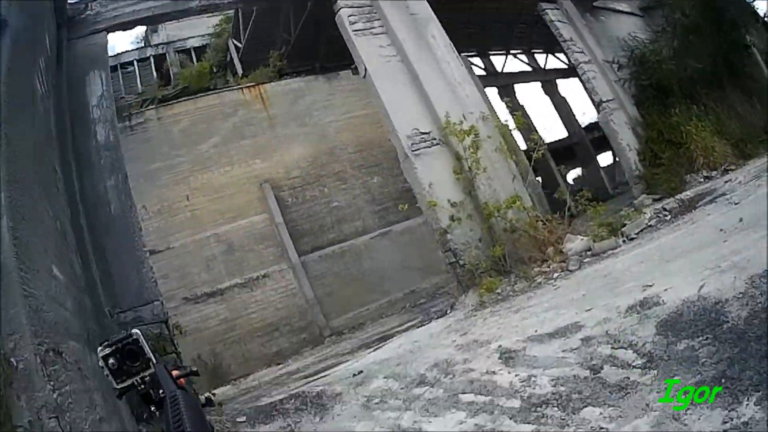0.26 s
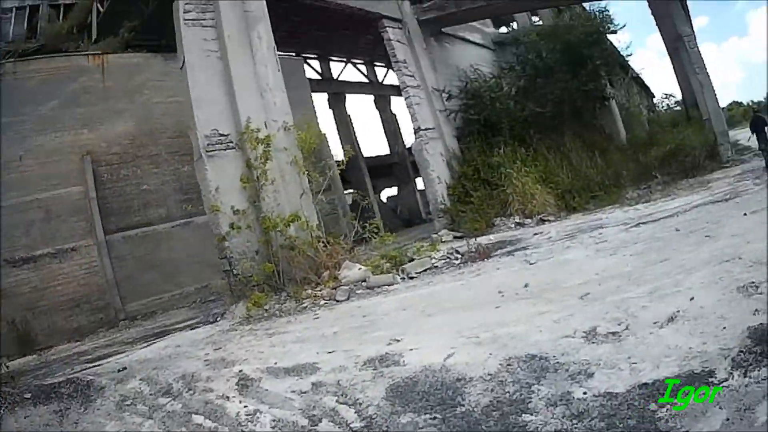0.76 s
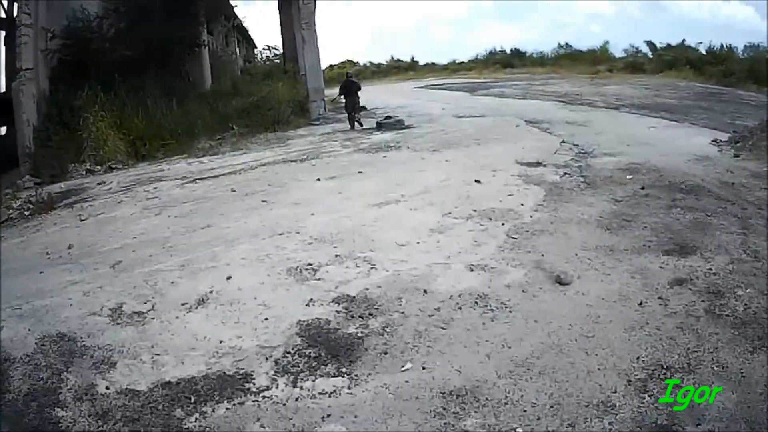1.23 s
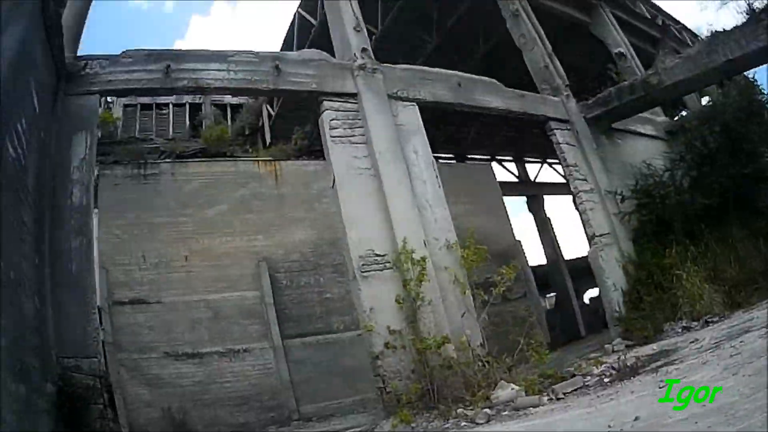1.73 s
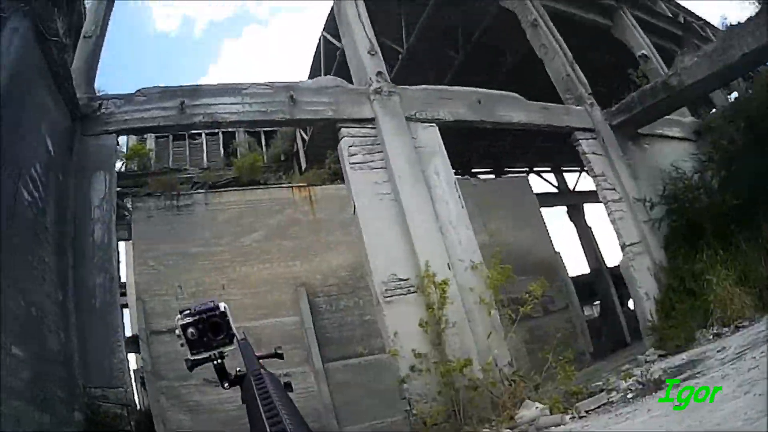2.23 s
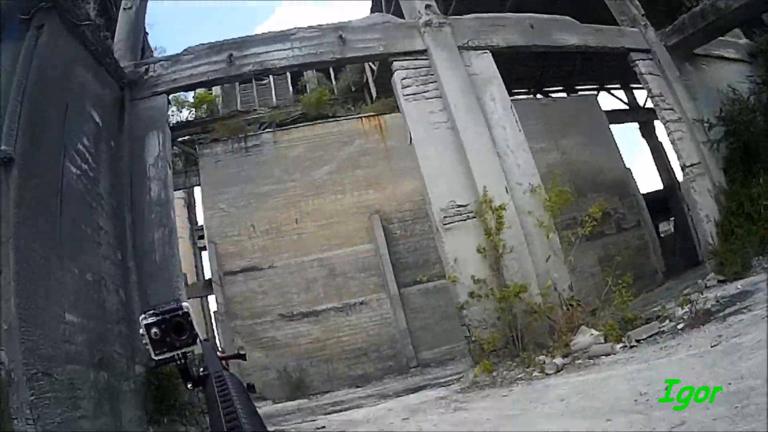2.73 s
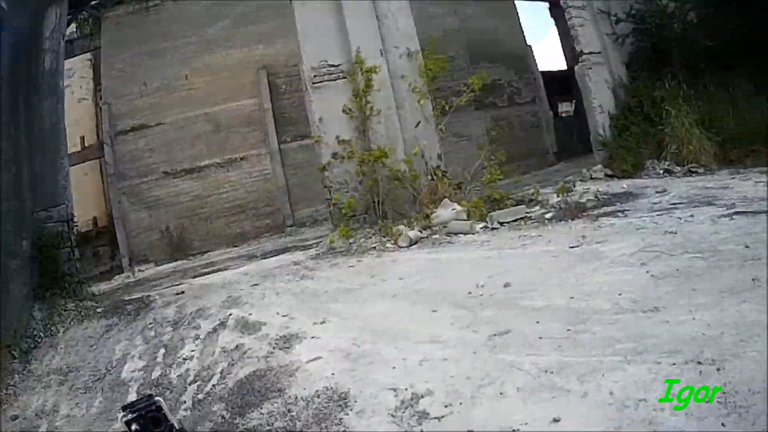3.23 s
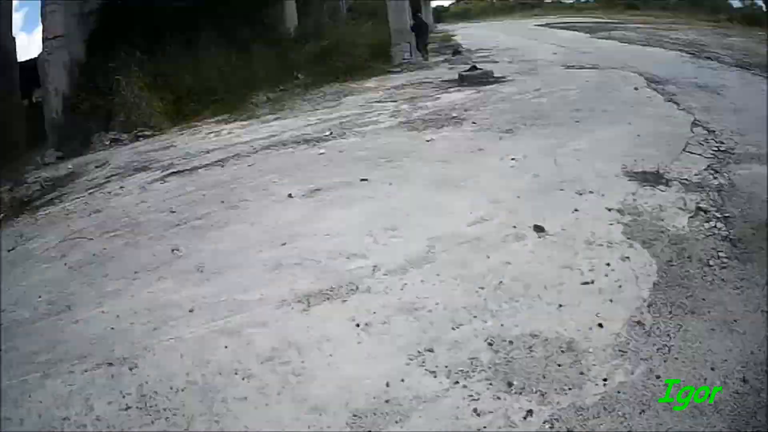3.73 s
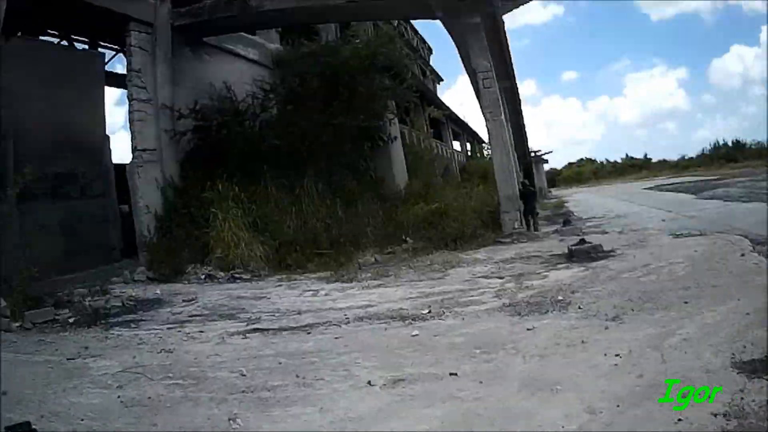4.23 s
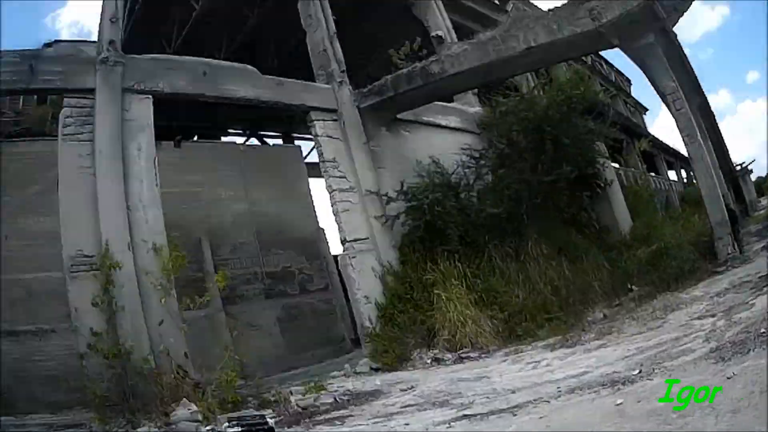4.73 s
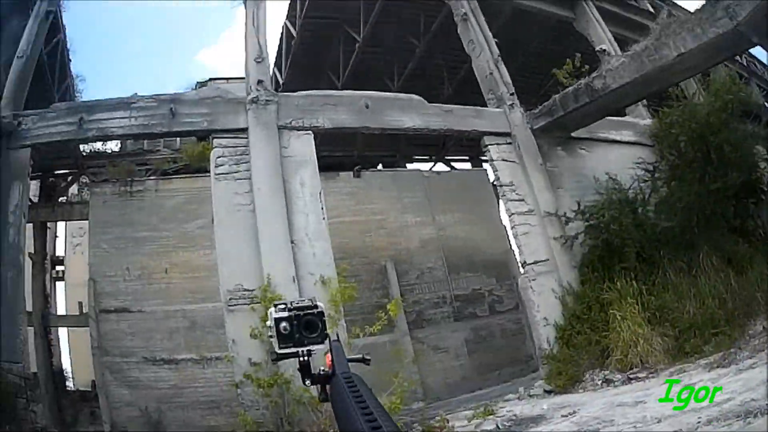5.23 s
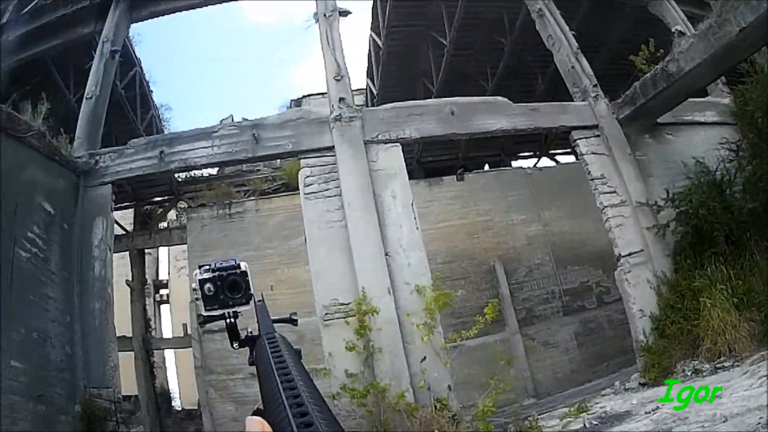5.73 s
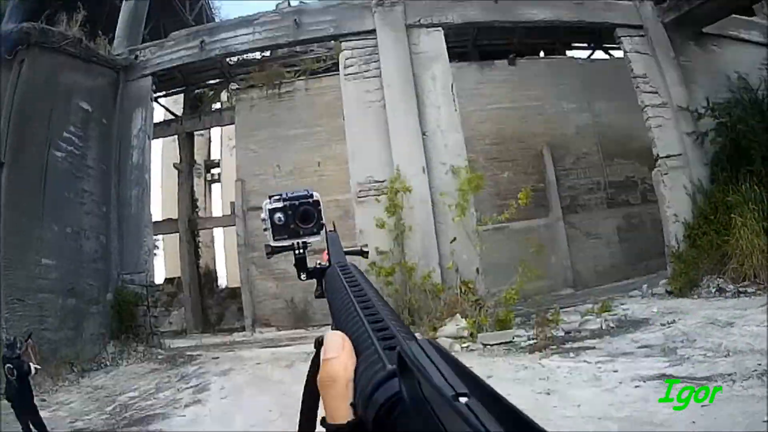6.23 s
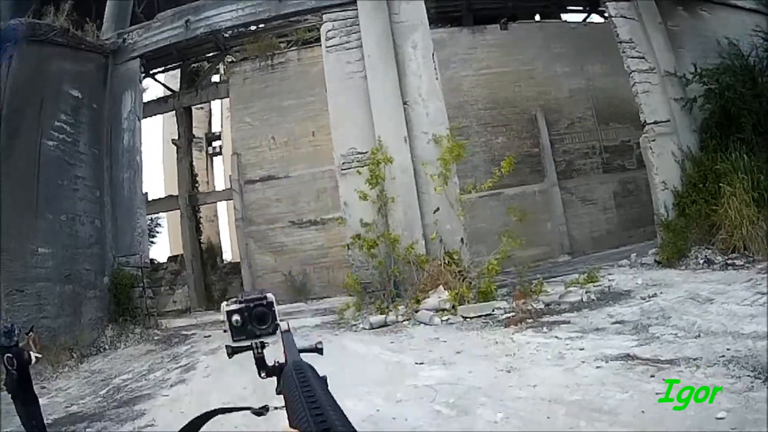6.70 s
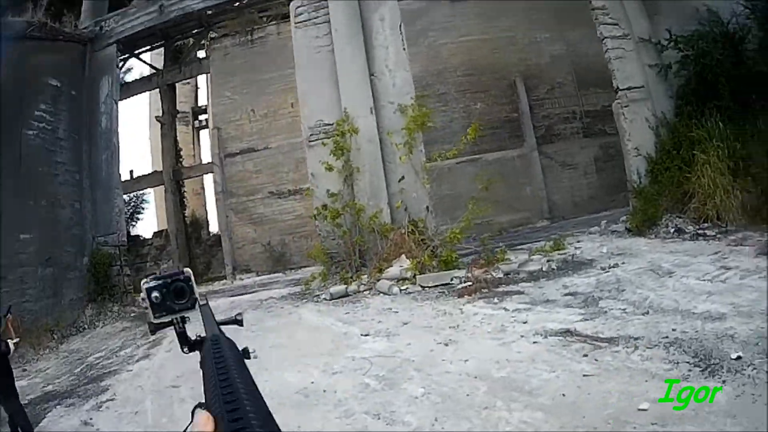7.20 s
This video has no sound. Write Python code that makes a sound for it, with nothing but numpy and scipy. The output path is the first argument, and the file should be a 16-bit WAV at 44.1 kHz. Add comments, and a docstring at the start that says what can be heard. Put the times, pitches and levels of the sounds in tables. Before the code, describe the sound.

Clustered dull jolts and hard plastic-like ticks come about twice a second as worn gear bounces with someone's steps. Early steps are light, then several heavy ones thump with gritty scuffing; a crisp click sounds halfway, and later steps keep knocking, some with a faint thin metallic ring. The sound is very close, muffled and dry, carried through the body, with a quiet open-air rumble and soft hiss between steps.

```python
"""Dull thuds, bounces and knocks of loose gear, with short scuffs of cloth and grit, follow someone's steps.
The walk is over a gritty concrete floor in an open ruin, the microphone worn on the body in a closed case.
Each step jolts the case through the body: pressure pulses push it, and forces ring its modes and fittings.
Shaped noise gives the sway of each stride, the far outdoor rumble and the hiss of the microphone."""
import sys
import numpy as np
from scipy import signal
from scipy.fft import rfft, irfft
from scipy.io import wavfile

SR = 44100
rng = np.random.default_rng(int(sys.argv[2]) if len(sys.argv) > 2 else 0)


def bounce(signal):
    """Save signal as a 16-bit WAV file at the path given by the first command-line argument."""
    frames = np.transpose(np.atleast_2d(signal))
    limited = np.clip(frames, -1, 1)
    pcm = np.round(limited * 32767).astype(np.int16)
    wavfile.write(sys.argv[1], SR, pcm)


def undo_db(level):
    """Turn decibels back into plain size, where 20 dB means ten times bigger."""
    steps = np.asarray(level, float) / 20
    return 10 ** steps


N = 328986   # length in samples


def rms_one(x):
    """Normalization: scales a signal to an rms of 1."""
    return x / np.sqrt(np.mean(x ** 2) + 1e-20)


def butter(x, order, hz, kind="low"):
    """Butterworth filtering: a maximally flat pass band."""
    return signal.sosfilt(signal.butter(order, hz, kind, fs=SR, output="sos"), x)


def ring(force, hz, t60):
    """Damped resonance: a unit click sets a decaying sine of initial height 1 ringing."""
    radius = undo_db(-60 / (t60 * SR))
    w = 2 * np.pi * hz / SR
    return signal.lfilter([0, np.sin(w)], [1, -2 * radius * np.cos(w), radius ** 2], force + 1e-18)


def add(out, start_s, shape):
    """Superposition: mixes a shape in at a time."""
    i = max(round(start_s * SR), 0)
    out[i:i + len(shape)] += shape[:N - i]


# Spectrum of the background noise. Each row: frequency in Hz, relative level in dB per Hz.
RUMBLE_SPECTRUM = [(53, -30), (90, 0.5), (307, -3.5), (3150, -26), (13900, -30), (15500, -31.5)]
RUMBLE_DB = -61.5   # rms


def rumble():
    """Spectral shaping of steady noise: far rumble below, microphone hiss above."""
    hz, level_db = np.transpose(RUMBLE_SPECTRUM)
    bins_hz = np.arange(N // 2 + 1) * SR / N + 1
    colour = undo_db(np.interp(np.log(bins_hz), np.log(hz), level_db))
    noise = irfft(rfft(rng.standard_normal(N)) * colour, N)
    return undo_db(RUMBLE_DB) * rms_one(noise)


# Lurches of the body with each stride. Each row: peak time in seconds, level at the peak in dB.
STRIDES = [(0.25, -50.5), (0.58, -56), (1.04, -49.5), (1.56, -50), (2.04, -45.5), (2.55, -51),
           (3.06, -52.5), (3.6, -51), (4.23, -47.5), (4.76, -51), (5.15, -55), (5.65, -47), (6.28, -48.5),
           (6.75, -56), (7.35, -52)]
SWAY_RISE_DB_PER_S, SWAY_FALL_DB_PER_S, SWAY_REST_DB = 100.5, 76, -69


def sway():
    """Modulated low-band noise: lumpy pressure on the case swells into each stride and dies after it."""
    t = np.arange(N) / SR
    level = np.full(N, undo_db(SWAY_REST_DB))
    for s, peak_db in STRIDES:
        slope = np.where(t < s, SWAY_RISE_DB_PER_S, -SWAY_FALL_DB_PER_S)
        level += undo_db(peak_db + slope * (t - s))
    noise = rng.standard_normal(N + SR)
    low = butter(noise, 3, [14, 48], "band")[SR:]   # drop the second in which the filter settles
    return level * rms_one(low)


# Steps that set a small metal fitting ringing. Each row: strike in seconds, force level in dB.
BUCKLE_STRIKES = [(0.634, -74), (1.21, -74), (3.07, -68.5), (4.199, -64), (4.693, -64), (5.16, -71),
                  (7.35, -67.5)]
BUCKLE_HZ, BUCKLE_T60_S = 1380, 0.46


def buckle():
    """Cascaded resonance: two equal tunings in series give a thin ring that starts softly and wavers."""
    force = np.zeros(N)
    for s, level_db in BUCKLE_STRIKES:
        add(force, s, [undo_db(level_db)])
    waver = rms_one(butter(rng.standard_normal(N), 2, 40))
    tone = ring(ring(force, BUCKLE_HZ, BUCKLE_T60_S), BUCKLE_HZ, .05) / 100
    return tone * undo_db(4 * waver)   # waver of 4 dB rms


# The click behind the snap. It holds: time in seconds, force level in dB.
SNAP_CLICK = (3.6535, -26)
# Modes of the snap. Each row: frequency in Hz, gain in dB, t60 in seconds.
SNAP_RESONANCES = [(910, -1, 0.0085), (2030, -0.5, 0.01), (3140, -5.5, 0.011), (3700, -0.5, 0.0025),
                   (5100, -4.5, .004), (7000, -20, .002)]


def snap():
    """Modal excitation: a single click into short modes of alternating sign makes one dry, bright crack."""
    click, out = np.zeros(N), np.zeros(N)
    s, level_db = SNAP_CLICK
    add(click, s, [undo_db(level_db)])
    for k, (hz, gain_db, t60) in enumerate(SNAP_RESONANCES):
        out += (-1) ** k * undo_db(gain_db) * ring(click, hz, t60)
    return out


def soften(force):
    """Contact filtering: a padded contact carries little treble."""
    return butter(force + 1e-18, 2, 1900)


# Modes of the case, struck or rubbed. Each row: frequency in Hz, gain in dB, t60 in seconds.
CASE_MODES = [(542, -2, 0.018), (785, 2, 0.0048), (950, -6, 0.01), (1278, 5.5, 0.0084), (1560, -23, 0.0022),
              (2180, 1, 0.0095), (2527, -8.5, 0.016), (2990, -3, 0.0055), (3450, -11, 0.01),
              (4620, -27, 0.006), (5400, -15, 0.0044)]
HOLLOW_TO_HZ, BRIGHT_FROM_HZ = 850, 1500   # borders of the three groups of modes
SHELL_CUT_HZ = 4280


def case(hollow, dull, bright):
    """Modal synthesis: low, middle and upper modes each hear their own force; the shell is a band-pass."""
    out = np.zeros(N)
    for hz, gain_db, t60 in CASE_MODES:
        uneven = rng.uniform(0.55, 1.39, N)   # no two contacts strike a mode alike
        if hz > BRIGHT_FROM_HZ:
            force = uneven * bright
        elif hz > HOLLOW_TO_HZ:
            force = soften(uneven * dull)
        else:
            force = soften(uneven * hollow)
        out += undo_db(gain_db) * ring(force, hz, t60)
    out = butter(out, 2, 380, "high")
    return butter(out, 4, SHELL_CUT_HZ)


# Scuffs of cloth and grit. Each row: start in seconds, length in seconds, stroke level in dB,
# force on the upper modes relative to the rest in dB.
SCUFF_STROKES = [(0.044, 0.03, -82.5, -0.5), (0.625, 0.095, -84.5, -3.5), (1.07, 0.02, -65.5, -2.5),
                 (1.101, 0.032, -74, 0.5), (1.134, 0.043, -67.5, 0.5), (1.2, 0.039, -73.5, 2.5),
                 (1.584, 0.028, -75.5, 4.5), (1.836, 0.013, -80.5, 4.5), (2.024, 0.015, -72, 0),
                 (2.044, 0.035, -71, -1.5), (2.084, 0.049, -67.5, -2.5), (3.069, 0.01, -75, 11),
                 (3.643, 0.015, -61.5, -7.5), (3.652, 0.017, -69, -7), (3.691, 0.0095, -75, -6),
                 (3.862, 0.023, -78.5, 3), (4.236, 0.023, -78.5, 1), (4.736, .015, -80, -3),
                 (5.183, 0.029, -73, 1.5), (5.217, 0.034, -72.5, -2), (6.214, 0.038, -80.5, -4),
                 (6.252, 0.027, -71.5, -2), (7.302, 0.035, -80, -5), (7.346, 0.021, -72.5, 0)]


def scuffs():
    """Granular friction: dense uneven grains under a short stroke excite the case."""
    dull, bright = np.zeros(N), np.zeros(N)
    weight = undo_db(3.83 * np.minimum(rng.exponential(1, N), 3))
    present = rng.random(N) < .12
    grains = 1.58 * rng.standard_normal(N) * weight * present
    for s, length, level_db, bright_db in SCUFF_STROKES:
        stroke = undo_db(level_db) * signal.windows.tukey(round(length * SR), .4)
        add(dull, s, stroke)
        add(bright, s, stroke * undo_db(bright_db))
    return case(dull * grains, dull * grains, bright * grains)


# Swings of the body into heavy steps. Each row: strike in seconds, level before shaping in dB,
# length in seconds.
SWINGS = [(0.582, -40, 0.023), (1.065, -20.5, 0.03), (1.556, -18.5, 0.025), (2.019, -15.5, 0.025),
          (3.067, -24, 0.033), (3.594, -28.5, 0.027), (4.191, -23.5, 0.026), (4.686, -26, 0.021),
          (5.149, -26, 0.04), (6.187, -31, 0.094), (6.71, -30.5, 0.033), (7.271, -28.5, 0.034)]


def windups():
    """Inertial pressure: one slow swing, out and then in, runs up to a heavy step."""
    out = np.zeros(N)
    for s, level_db, length in SWINGS:
        turn = np.linspace(0, 1, round(length * SR))
        envelope = turn ** 1.07 * np.sin(np.pi * turn) ** 0.22
        add(out, s - length * 0.825, undo_db(level_db) * np.sin(2 * np.pi * turn) * envelope)
    return out


# Hard knocks riding on the jolts. Each row: start in seconds, force level in dB,
# force on the upper modes relative to the middle ones in dB.
HARD_KNOCKS = [(0.544, -53, -22), (0.597, -33.5, -5.5), (0.608, -44, -8), (0.639, -50, -14),
               (1.063, -23.5, -5), (1.094, -41, -24), (1.106, -30.5, -6.5), (1.129, -46, -30),
               (1.136, -33, -17), (1.192, -43.5, -23), (1.207, -39.5, -8), (1.381, -53.5, -1),
               (1.563, -27.5, -14), (1.567, -38.5, -3.5), (1.585, -42, -6), (1.609, -40.5, -6),
               (1.840, -45, -23), (2.015, -25.5, -0.5), (2.038, -37, -32), (2.081, -29.5, -11),
               (2.144, -38.5, -25), (2.532, -49, -24), (2.581, -49, -7), (3.0674, -27, -22),
               (3.075, -33.5, -25), (3.09, -39, -25), (3.607, -33.5, -26), (3.612, -40, -4),
               (3.684, -42.5, -32), (4.195, -35, -20), (4.2006, -29, -4), (4.219, -46, -20),
               (4.288, -49, -29), (4.301, -44, -25), (4.687, -40, -12), (4.693, -27, -2),
               (4.718, -43.5, -25), (5.112, -49.5, -8), (5.152, -37, -35), (5.156, -31.5, -6.5),
               (5.172, -38.5, -15), (5.224, -43, -17), (5.266, -46.5, -23), (5.649, -45, -29),
               (5.672, -46, -8), (6.184, -36.5, -35), (6.193, -35.5, -5), (6.206, -38, -26),
               (6.253, -29.5, -37), (6.289, -42.5, -11), (6.362, -50, -22), (6.71, -38.5, -25),
               (6.719, -31.5, -5.5), (7.270, -41, -12), (7.2764, -29.5, -3), (7.295, -44, -24),
               (7.346, -32.5, -36), (7.381, -48, -24)]
RATTLE_T60_S = 0.027
HOLLOW_DB, HOLLOW_PER_BRIGHT_DB = -3.0, -0.12   # dull knocks sound hollower


def knocks():
    """Impact excitation: one firm tick, then a dying rattle of smaller ones, strikes the case."""
    forces = np.zeros((3, N))
    t = np.arange(round(.05 * SR)) / SR
    size = (len(HARD_KNOCKS), len(t))
    ticks = rng.choice([-1, 1], size) * (rng.random(size) < .3)
    rattle = 0.14 * undo_db(-60 * t / RATTLE_T60_S) * np.minimum(t / 0.00064, 1)
    for (s, level_db, bright_db), grit in zip(HARD_KNOCKS, ticks):
        force = grit * rattle
        force[round(.001 * SR)] = -0.41   # the firm tick
        hollow_db = HOLLOW_DB + HOLLOW_PER_BRIGHT_DB * bright_db
        for band, colour_db in zip(forces, (hollow_db, 0, bright_db)):
            add(band, s, undo_db(level_db + colour_db) * force)
    return case(*forces)


# Springy jolts of the case. Each row: deepest point in seconds, depth in dB, release time in ms,
# rebound level before shaping in dB, kick to the mount in dB.
SPRINGY_JOLTS = [(0.1902, -35, 3.8, -31.5, -70), (0.2542, -31.5, 3.9, -35, -61),
                 (0.592, -25, 5.5, -40, -57), (1.0658, -16, 4.7, -33, -21.5),
                 (1.0845, -26.5, 4.9, -28, -32), (1.0988, -26.5, 3.9, -40, -58),
                 (1.1398, -19.5, 3.4, -39, -26), (1.1777, -29, 2.3, -29, -41),
                 (1.2101, -31, 3.5, -30.5, -59), (1.566, -17.5, 3.4, -29, -65),
                 (1.584, -27.5, 10, -28, -43.5), (1.6116, -32, 8.1, -36, -42.5),
                 (1.8501, -28.5, 3.7, -42, -73), (2.0165, -18, 2.9, -16.5, -18),
                 (2.044, -17.5, 5.1, -22, -34), (2.085, -17.5, 4.1, -28, -32.5),
                 (2.1418, -26.5, 5.2, -46, -39.5), (2.5349, -28, 3.6, -30, -69),
                 (3.0697, -16, 3.47, -24, -21), (3.1523, -32, 3.9, -31, -69), (3.5974, -24.5, 11, -35, -40),
                 (3.6105, -16.5, 3.74, -22.5, -31.5), (3.687, -24, 2.76, -31, -60),
                 (3.7625, -35, 4.6, -37.5, -57), (3.9908, -39.5, 8.1, -38, -61),
                 (4.0651, -37, 3.1, -38, -52), (4.1992, -18, 3.46, -24, -25),
                 (4.2915, -27.5, 3.7, -30, -55), (4.307, -35, 3.7, -36, -51), (4.619, -34.5, 4, -35.5, -61),
                 (4.6597, -46, 6.2, -42, -45), (4.691, -21, 4.2, -29, -55), (5.1544, -15.5, 3.56, -19, -25),
                 (5.176, -26.5, 8.8, -32, -38), (5.2263, -21.5, 3.4, -29, -38.5),
                 (5.2457, -36, 3.8, -27, -42), (5.6535, -26.5, 3.64, -26.5, -62),
                 (6.187, -20.5, 3.84, -25, -45), (6.2117, -27, 4.9, -32, -57),
                 (6.256, -20, 3.35, -25.5, -26), (6.3357, -31.5, 3.7, -32.5, -70),
                 (6.714, -22.5, 3.4, -31, -55), (7.2737, -21.5, 3.86, -24.5, -55),
                 (7.2975, -24, 3.6, -31, -59), (7.348, -27, 2.3, -22.5, -23.5),
                 (7.3697, -36, 7, -29.5, -40)]
# Dead thuds as the case settles back. Each row: deepest point in seconds, depth in dB, release time in ms.
DEAD_THUDS = [(0.175, -40, 13), (0.322, -47, 6.6), (0.6998, -37.5, 22), (0.82, -43.5, 3.7),
              (2.3308, -44.5, 4.2), (4.378, -47, 5), (0.2135, -36, 4.4), (0.5517, -40.5, 4.5),
              (0.636, -33.5, 29), (0.744, -37.5, 4.8), (1.123, -25, 11), (1.1958, -27.5, 4.3),
              (1.2187, -31.5, 4.7), (1.554, -24, 10.5), (1.8603, -34, 5.5), (1.873, -35.5, 16),
              (1.899, -41, 5.1), (2.065, -22, 7.9), (2.5198, -33.5, 17), (2.5504, -30, 5.2),
              (2.589, -29.5, 3.7), (3.093, -22.5, 5.2), (3.1698, -36, 5.3), (3.6299, -25, 5.2),
              (3.649, -29, 8.8), (3.715, -37, 4.9), (3.7917, -40.5, 7.6), (4.2234, -26, 4.5),
              (4.2498, -38, 4.3), (4.2628, -37, 3.2), (4.7223, -24.5, 5.1), (4.7516, -35, 5.5),
              (5.1966, -24.5, 4.7), (5.212, -28, 2.6), (5.27, -32, 5), (5.6757, -29, 4.2),
              (6.2326, -33.5, 19), (6.2925, -27, 4.6), (6.355, -38, 3.5), (6.369, -37.5, 5),
              (6.743, -30, 5), (7.3851, -28.5, 4.8)]
THUD_REBOUND_DB, THUD_RING_DB = -41, -30   # relative to the depth of the thud
# Outward slaps, the case caught by its strap just after a push. Each row: peak in seconds, height in dB,
# half length in ms, kick to the mount in dB.
STRAP_SLAPS = [(0.599, -32.5, 2.57, -25), (1.571, -17.5, 4, -45), (4.303, -21, 1.7, -55),
               (4.6963, -29, 2.14, -23), (6.194, -26.5, 2.4, -55), (6.72, -15.5, 2.2, -53),
               (7.2787, -25.5, 2.4, -31)]
LONGEST_REBOUND_S = 0.051
MOUNT_HZ, MOUNT_T60_S = 206.2, 0.039
STRAP_HZ, STRAP_T60_S = 116.6, 0.049


def jolts():
    """Mass on a spring: a fast push inward, a rebound sagging until the next contact, a ring of the mount."""
    pressure, rebound, kicks = np.zeros(N), np.zeros(N), np.zeros(N)
    thuds = [(s, db, ms, db + THUD_REBOUND_DB, db + THUD_RING_DB) for s, db, ms in DEAD_THUDS]
    pushes = sorted(SPRINGY_JOLTS + thuds)
    following = [s - ms / 1000 * 0.62 for s, _, ms, *_ in pushes[1:]] + [N / SR]
    for (s, depth_db, ms, rebound_db, kick_db), next_s in zip(pushes, following):
        contact = ms / 1000
        onset = contact * np.clip(contact / 0.0039, .4, 1)   # short, hard contacts set in faster than they let go
        t = np.arange(-onset, contact, 1 / SR)
        phase = np.pi / 2 * t / np.where(t < 0, onset, contact)
        add(pressure, s - onset, -undo_db(depth_db) * np.cos(phase) ** 2)

        start = s + .5 * contact
        length = np.clip(next_s - start, .004, LONGEST_REBOUND_S)
        turn = np.linspace(0, 1, round(length * SR))
        sag = 0.9 * np.abs(np.sin(np.pi * turn)) ** 0.29 * np.exp(-.5 * turn)
        add(rebound, start, undo_db(rebound_db) * sag)
        add(kicks, s + 0.0014, [undo_db(kick_db)])
    for s, height_db, ms, kick_db in STRAP_SLAPS:
        add(pressure, s - ms / 1000, undo_db(height_db) * np.hanning(round(2 * ms / 1000 * SR)))
        add(kicks, s - .002, [undo_db(kick_db)])
    strap = 0.0026 * ring(pressure, STRAP_HZ, STRAP_T60_S)   # springs back after each push
    mount = 1.69 * ring(kicks, MOUNT_HZ, MOUNT_T60_S)
    return pressure + strap + butter(rebound + mount, 2, 320)   # flesh and padding round off both


def scene():
    """Superposition: everything reaches one microphone."""
    background = rumble() + sway()
    fittings = buckle() + snap()
    steps = scuffs() + windups() + knocks() + jolts()
    return (background + fittings + steps)[None]


def low_pass(x):
    """Removes everything above the highest recorded frequency."""
    return signal.sosfilt(signal.butter(12, 15710, fs=SR, output="sos"), x)


def record(dry):
    """High-pass filtering: the input weakens the slowest pressure."""
    mix = butter(dry, 1, 12, "high")
    return low_pass(mix)


dry = scene()
out = record(dry)
bounce(out)
```